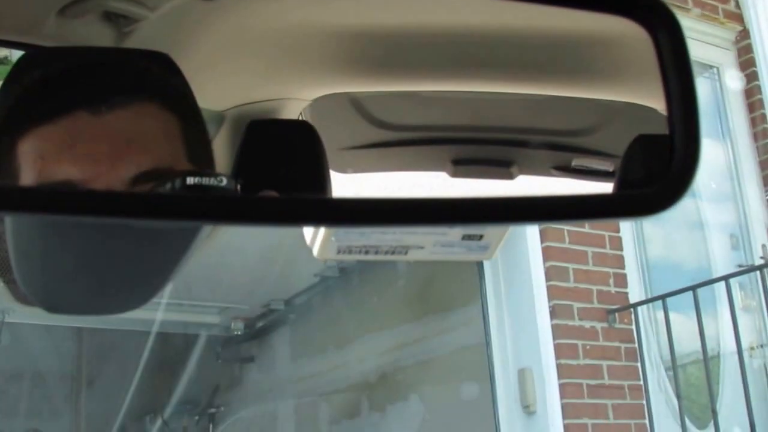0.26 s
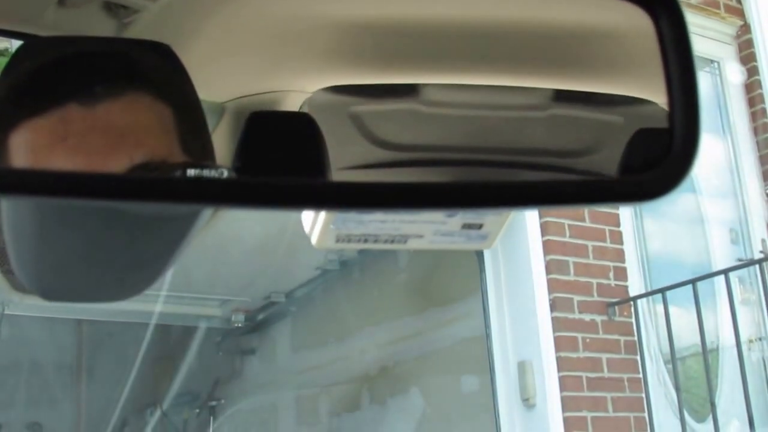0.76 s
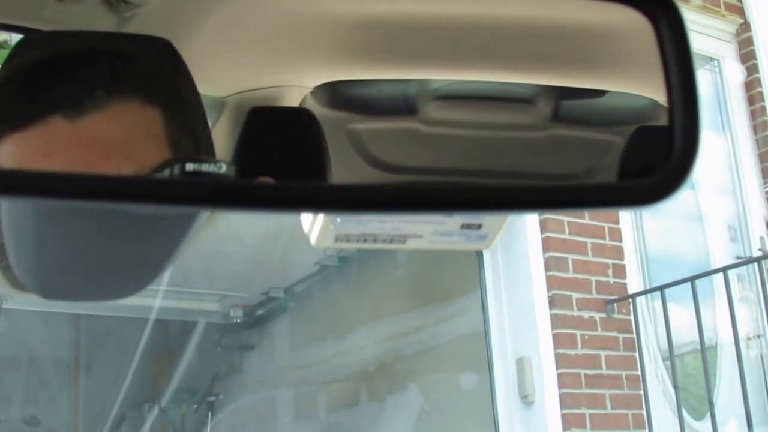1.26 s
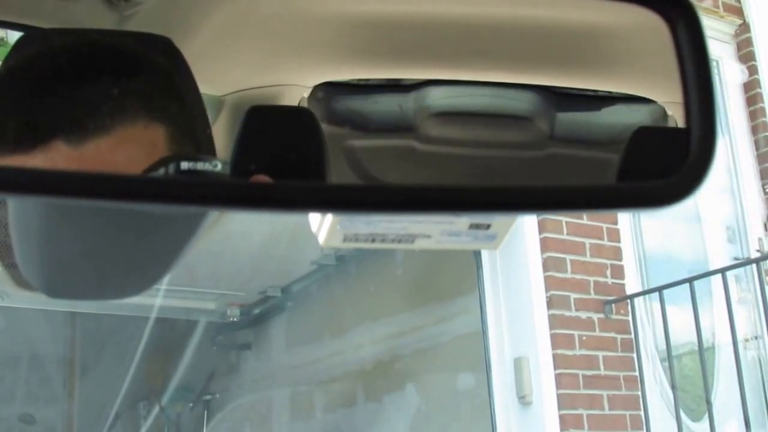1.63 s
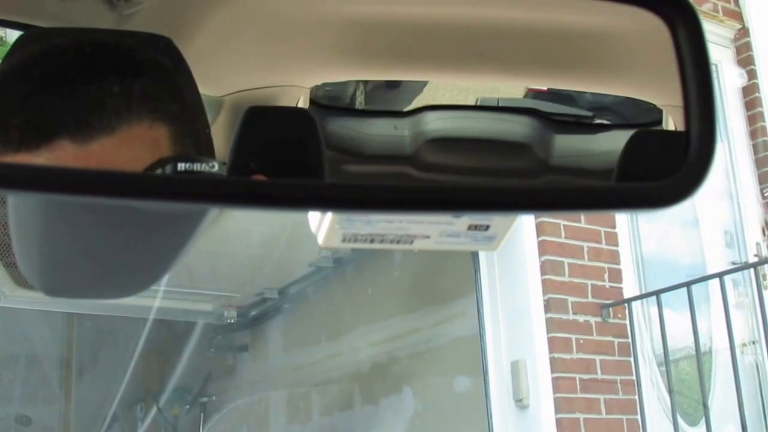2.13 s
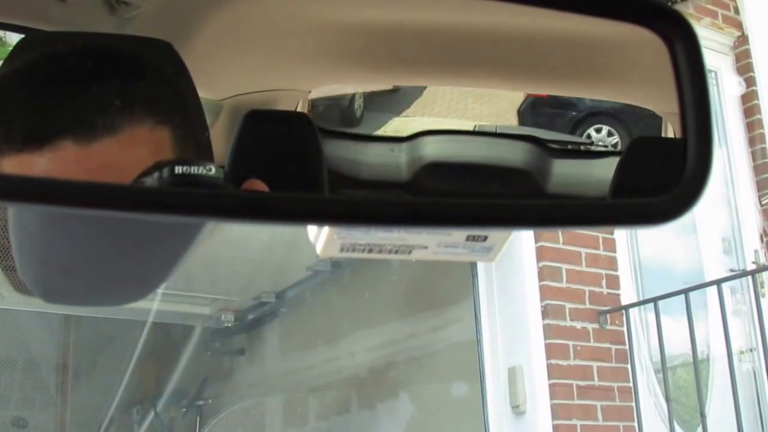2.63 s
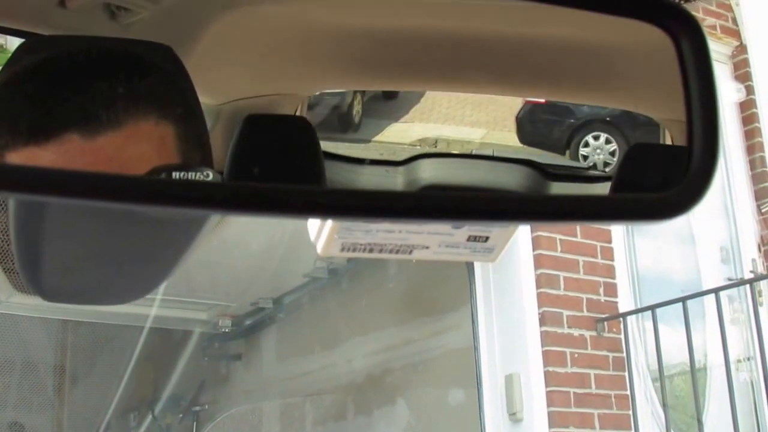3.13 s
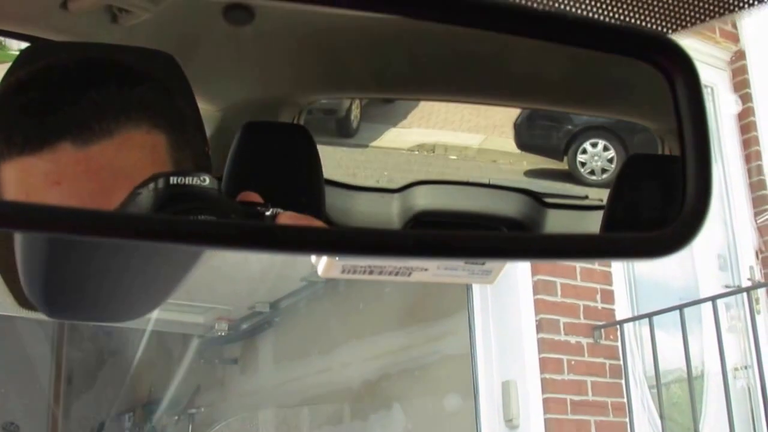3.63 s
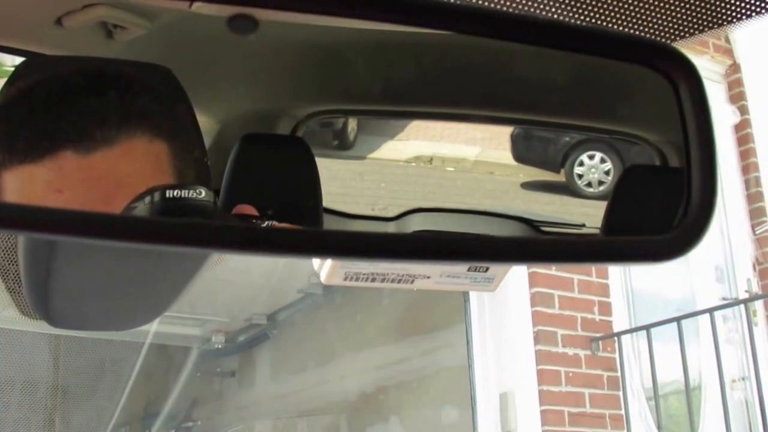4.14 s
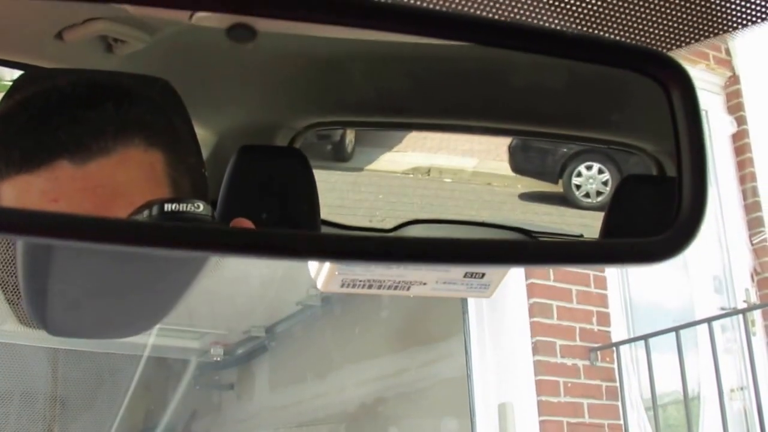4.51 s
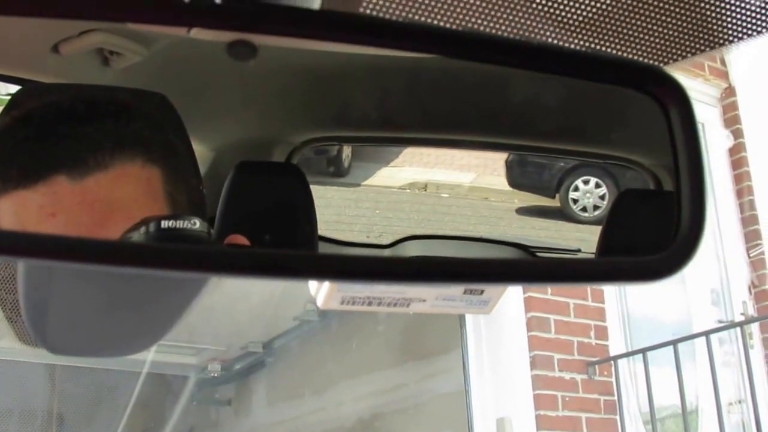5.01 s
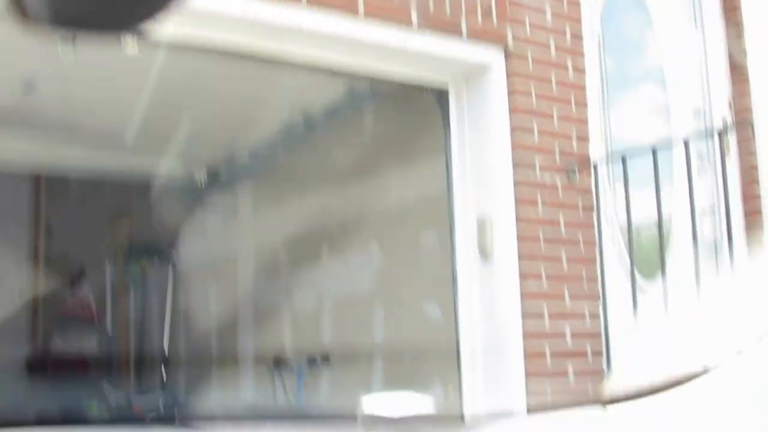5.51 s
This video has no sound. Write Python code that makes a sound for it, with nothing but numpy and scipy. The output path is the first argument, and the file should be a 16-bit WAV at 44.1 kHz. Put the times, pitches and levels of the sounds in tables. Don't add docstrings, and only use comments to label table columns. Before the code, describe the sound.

Recorded by hand inside a parked, idling car: low engine boom and soft blower hiss run throughout. After four seconds the rear hatch lands with a huge bassy thump, striker rattle and sharp metallic latch snap. Nearly a second later a duller mechanical click follows, then rustling and small plastic ticks as the recorder is turned.

```python
import sys
import numpy as np
from scipy import signal
from scipy.fft import rfft, irfft
from scipy.io import wavfile
from scipy.ndimage import uniform_filter1d

SR = 44100
rng = np.random.default_rng(int(sys.argv[2]) if len(sys.argv) > 2 else 0)


def invert_db(x):
    u = np.asarray(x, float) / 20
    return 10 ** u


def wav_record(signal):
    frames = np.transpose(np.atleast_2d(signal))
    bounded = np.clip(frames, -1, 1)
    quanta = np.round(bounded * 32767).astype(np.int16)
    wavfile.write(sys.argv[1], SR, quanta)


N = 254192
TIME = np.arange(N) / SR

# (frequency [Hz], left over right [dB])
HATCH_BALANCE = [(60, 1), (110, -5), (200, -6), (380, -2.5), (700, -5.5), (1290, -8.5), (2380, -5),
                 (4400, -3), (8120, -1), (15000, -1.0)]
# (frequency [Hz], level [dB], t60 [s])
LATCH_MODES = [(720, -3, .06), (950, -4, .07), (1990, -7, .08), (3260, -13, .07), (3420, -8, .09),
               (4210, -7, .08), (4740, -4, .09), (5290, -8, .07), (6020, -11, .07), (6370, -9, .07),
               (6700, -4, .08)]


def rms_one(x):
    return x / np.sqrt(np.mean(x ** 2) + 1e-20)


def at_hz(points, hz):
    table = np.array(points)
    return np.interp(np.log(hz + 1), np.log(table[:, 0]), table[:, 1])


def drift(rate):
    r = np.exp(-80 * np.pi * rate / SR)
    noise = rng.standard_normal(N // 40 + 2002)
    slow = signal.lfilter([1], [1, -2 * r, r * r], noise)[2000:]
    return np.interp(np.arange(N) / 40, np.arange(len(slow)), rms_one(slow))


def pair(left_right_db):
    return invert_db(np.array([[.5], [-.5]]) * left_right_db)


def coloured(spectrum, alike, lean_db):
    hz = np.arange(N // 2 + 1) * SR / N
    mid, side = rfft(rng.standard_normal((2, N))) * invert_db(at_hz(spectrum, hz))
    share = np.clip(alike(hz), -1, 1)
    both = np.sqrt(1 + share) * mid + np.sqrt(1 - share) * side * [[1], [-1]]
    return rms_one(irfft(both * pair(lean_db(hz)), N))


def resonate(x, hz, width_hz):
    r = np.exp(-np.pi * width_hz / SR)
    angle = 2 * np.pi * min(hz, SR / 2.2) / SR
    return signal.lfilter([(1 - r * r) / 2, 0, (r * r - 1) / 2], [1, -2 * r * np.cos(angle), r * r], x)


def struck(s, rise_s, t60):
    out = np.zeros(N)
    first = int(np.ceil(s * SR))
    age = TIME[first:first + int(2 * t60 * SR)] - s
    out[first:first + len(age)] = (1 - np.exp(-age / max(rise_s, 1e-4))) * invert_db(-60 * age / t60)
    return out


def tones(rows, phase, wobble_db, slip_rad):
    out = np.zeros((2, N))
    for multiple, level_db, left_right_db, lag in rows:
        angle = multiple * phase + rng.uniform(0, 2 * np.pi) + slip_rad * multiple * drift(1.0)
        gain = np.sqrt(2) * invert_db(level_db + wobble_db * drift(1.6)) * pair(left_right_db)
        out += gain * np.sin([angle - lag, angle])
    return out


def clack(blows, colour, modes, modes_db, alike):
    grain = coloured(colour, lambda hz: alike + 0 * hz, lambda hz: at_hz(HATCH_BALANCE, hz))
    burst = grain * sum(invert_db(db - 1.5) * struck(s, rise_s, t60) for s, db, rise_s, t60 in blows)
    span = slice(int(blows[0][0] * SR), int((blows[-1][0] + .5) * SR))
    white = rms_one(rng.standard_normal((2, N)) + 0.59 * rng.standard_normal(N))
    force = sum(invert_db(db) * struck(s, rise_s, t60 / 2) for s, db, rise_s, t60 in blows)
    excitation = (white * force + 1e-18)[:, span]
    for hz, db, t60 in modes:
        ringing = resonate(excitation, hz, 2 * np.log(1000) / np.pi / t60)
        burst[:, span] += invert_db(db + modes_db) * pair(at_hz(HATCH_BALANCE, hz)) * ringing
    return burst


def rings(rows, leaning, cycles=32, rise_s=None, left_lag_s=0.003):
    out = np.zeros((2, N))
    for s, peak_db, sign, hz in rows:
        lag_s = left_lag_s * 45 / (hz + 45)
        t60 = min(cycles / hz, 0.22)
        mode_rise_s = rise_s or 0.21 / hz
        swing = []
        for start in (s + lag_s, s - lag_s):
            swing.append(struck(start, mode_rise_s, t60) * np.sin(2 * np.pi * hz * (TIME - start)))
        out += np.sign(sign) * invert_db(peak_db) * pair(at_hz(leaning, hz)) * swing
    return out


def engine():
    # (time [s], firing rate [Hz], cabin level [dB])
    idle = [
        (0, 25.75, -0.5),
        (1.3, 26.05, 1),
        (2.5, 25.8, 1),
        (3.5, 25.84, -1.5),
        (3.95, 25.9, -1.5),
        (4.25, 25.9, -5),
        (4.55, 26.05, -2.5),
        (5.1, 25.9, 0),
        (5.76, 25.7, -1),
    ]
    # (multiple of firing rate [1], level [dB], left over right [dB], left phase lag [rad])
    orders = [(.5, -57, 9, 1.2), (.75, -55, 6, 1.2), (1, -32.3, 3.5, 1.23), (1.39, -46, 3, 1.1),
              (2, -35.5, -1, .95), (2.25, -53, -2, .8), (3, -42, -6, .63), (4, -48, -2.5, .5),
              (4.25, -52, -4, .5), (4.5, -52, -2, .5), (4.75, -45.5, -5, .4), (5, -47, -2, .4),
              (5.5, -46, -4, .4), (6, -54, -2, .3), (8, -59, -7, .3), (16.7, -62, -3, .5),
              (18.1, -62, -3, .5)]
    s, firing_hz, boom_db = np.transpose(idle)
    phase = 2 * np.pi * np.cumsum(np.interp(TIME, s, firing_hz)) / SR
    low = [row for row in orders if row[0] < 3.5]
    high = [row for row in orders if row[0] > 3.5]
    boom = tones(low, phase, wobble_db=1.0, slip_rad=0.045)
    rough = rng.standard_normal(N) + 0.36 * rng.standard_normal((2, N))
    band = rms_one(resonate(resonate(rough, 132.6, 61), 132.6, 61)) * pair(-6.5)
    drone = tones(high, phase, wobble_db=2.5, slip_rad=0.082)
    drone += invert_db(-41.5 + 2.0 * drift(16.0)) * band
    level_db = np.interp(TIME, s, boom_db)
    drone_follows = .6
    return invert_db(level_db) * boom + invert_db(drone_follows * level_db - 0.45) * drone


def blower():
    # (frequency [Hz], spectral density [dB per Hz])
    air_colour = [(9, -46), (17, -15.5), (45, -15), (90, -10), (150, -11), (195, -21.5), (250, -15.5),
                  (327, -20.5), (450, -21), (854, -27.5), (1030, -30), (1130, -32), (2170, -37),
                  (6000, -50), (15600, -60.5)]
    # (frequency [Hz], left-right likeness [1])
    likeness = [(60, 0.55), (130, 0.67), (290, 0.35), (640, 0.38), (1410, 0.32), (3100, -0.18),
                (6820, 0.31), (15000, -0.24)]
    # (frequency [Hz], left over right [dB])
    air_balance = [(60, 3), (110, -6.5), (200, -7.5), (380, -2.5), (700, -3.0), (1290, -2), (2380, -4),
                   (4400, -0.5), (8120, -1.5), (15000, -1.0)]
    # (frequency [Hz], width [Hz], level [dB])
    vents = [(387, 94, -53.5), (940, 163, -56)]
    # (frequency [Hz], level [dB], left over right [dB], left phase lag [rad])
    hum = [(179.85, -45.5, 2, .3), (359.7, -47, -.5, .5), (539.6, -60.5, -5, .5)]
    air = coloured(air_colour, lambda hz: at_hz(likeness, hz), lambda hz: at_hz(air_balance, hz))
    out = invert_db(-37.5 + 0.26 * drift(9.6)) * air
    for hz, width_hz, level_db in vents:
        out += invert_db(level_db + 1.9 * drift(19.0)) * rms_one(resonate(air, hz, width_hz))
    return out + tones(hum, 2 * np.pi * TIME, wobble_db=1.5, slip_rad=.001)


def handling():
    # (time [s], peak level [dB], centre frequency [Hz], t60 [s])
    ticks = [(1.165, -57, 12000, .06), (4.379, -48, 3000, .05), (4.765, -53, 5000, .05),
             (5.163, -52, 5000, .02), (5.178, -48, 1500, .03), (5.25, -51, 2500, .07),
             (5.293, -60, 8000, .03), (5.303, -60, 9000, .07), (5.379, -52, 7400, .04),
             (5.415, -51, 3200, .03), (5.456, -58, 8250, .06), (5.53, -56, 8500, .08),
             (5.549, -47, 11000, .015), (5.554, -41, 3000, .025), (5.635, -53, 9500, .08),
             (5.64, -52, 3500, 0.082), (5.688, -47, 6500, .015), (5.703, -42, 1500, .03)]
    rustle_from_s, rustle_rise_s, rustle_db = 5.25, .08, -56
    noise = rms_one(rng.standard_normal((2, N)) + 0.49 * rng.standard_normal(N)) * pair(-2.0)
    rustle = rms_one(resonate(noise, 1300, 1200))
    onset = (1 + np.tanh((TIME - rustle_from_s) / rustle_rise_s)) / 2
    out = rustle * invert_db(rustle_db + 3.2 * drift(10.0)) * onset
    for s, db, hz, t60 in ticks:
        span = slice(int(s * SR) - 500, int(s * SR) + SR // 4)
        width_hz = .5 * hz
        colour = rms_one(resonate(resonate(noise[:, span], hz, width_hz), hz, width_hz))
        out[:, span] += invert_db(db) * colour * struck(s, .0008, t60)[span]
    return out


def striker_chatter():
    # (time [s], peak level [dB], rise [s], t60 [s])
    contacts = [
        (4.002, -24, 0.00093, 0.072),
        (4.022, -21, 0.0032, 0.13),
        (4.051, -17.5, 0.0023, .12),
        (4.075, -34.5, 0.0027, 0.2),
        (4.094, -35.5, 0.0033, .1),
    ]
    # (frequency [Hz], spectral density [dB per Hz])
    chatter_colour = [(120, -32), (200, -2), (300, -4), (655, -8.5), (1460, -24), (3200, -22), (4280, -22),
                      (6640, -31), (9000, -41), (12000, -56), (15600, -70)]
    return clack(contacts, chatter_colour, LATCH_MODES, modes_db=7.5, alike=.45)


def hatch_thumps():
    # (time [s], peak level [dB], direction [sign], frequency [Hz])
    squeeze = [
        (4.022, 2.5, 1, 42),
    ]
    # (time [s], peak level [dB], direction [sign], frequency [Hz])
    air_pushes = [
        (4.088, 0, -1, 39.4),
        (4.144, -7.5, -1, 45.4),
        (4.254, -16.5, 1, 45),
        (4.46, -22, -1, 47),
        (4.772, -20, 1, 50),
        (4.843, -15, -1, 42),
        (5.16, -27, 1, 45.5),
        (5.237, -17, -1, 40),
        (5.545, -21.5, -1, 50),
    ]
    # (time [s], peak level [dB], direction [sign], frequency [Hz])
    panel_blows = [(4.003, -22.5, -1, 192), (4.0207, -19, 1, 337), (4.024, -21, 1, 479),
                   (4.034, -11.5, -1, 128), (4.048, -22, 1, 270), (4.057, -18, -1, 111),
                   (4.07, -22.5, 1, 200), (4.195, -20.5, 1, 115.5), (4.93, -22, 1, 129),
                   (5.065, -28, 1, 260), (5.255, -24.5, 1, 144)]
    thumps = rings(squeeze, HATCH_BALANCE, rise_s=0.021)
    return thumps + rings(air_pushes, HATCH_BALANCE) + rings(panel_blows, HATCH_BALANCE)


def latch_snap():
    # (time [s], peak level [dB], rise [s], t60 [s])
    contacts = [
        (4.109, -25, 0.00098, 0.065),
        (4.1145, -10, 0.0011, 0.082),
        (4.127, -22.5, 0.0024, 0.094),
        (4.14, -44, .002, 0.093),
    ]
    # (frequency [Hz], spectral density [dB per Hz])
    snap_colour = [(180, -25), (350, -4), (900, -1.5), (1150, -9.5), (1980, -7), (2710, -10.5),
                   (3400, -5.5), (5000, -8), (6950, -15), (7600, -17.5), (11000, -25.5), (14000, -35),
                   (15600, -48)]
    return clack(contacts, snap_colour, LATCH_MODES, modes_db=14.0, alike=0.33)


def motor_release():
    # (time [s], peak level [dB], rise [s], t60 [s])
    contacts = [
        (4.761, -36, .005, 0.11),
        (4.9235, -18.5, 0.0027, 0.11),
        (4.94, -30, 0.004, 0.037),
    ]
    # (frequency [Hz], spectral density [dB per Hz])
    release_colour = [(120, -32), (250, -4), (450, -1), (900, -3.5), (1660, -17.5), (2200, -20),
                      (3200, -15), (6500, -28.5), (9000, -36), (12000, -51), (15600, -60)]
    # (frequency [Hz], level [dB], t60 [s])
    release_modes = [(307, 0, 0.2), (602, 10.5, 0.1), (950, 1.5, 0.085), (2040, -0.5, 0.092),
                     (2605, -6.5, 0.1), (4160, -28, 0.11), (5550, -14, 0.08), (6900, -15, 0.051),
                     (8387, -34, 0.12), (8630, -19, 0.062)]
    # (time [s], peak level [dB], direction [sign], frequency [Hz])
    plate_knock = [
        (4.9229, -15, -1, 430),
        (4.9245, -20, 1, 540),
        (4.9285, -25, 1, 330),
        (4.934, -20, -1, 560),
        (4.926, -27, 1, 800),
    ]
    click = clack(contacts, release_colour, release_modes, modes_db=15, alike=0.32)
    return click + rings(plate_knock, HATCH_BALANCE)


def snick():
    # (frequency [Hz], peak level [dB])
    case_modes = [(1500, -26), (2200, -31), (3200, -32), (4600, -35), (6600, -34), (9500, -39),
                  (13000, -38)]
    rows = [(5.5553, db, (-1) ** (k + 1), hz) for k, (hz, db) in enumerate(case_modes)]
    return rings(rows, [(1500, -5), (8000, -17)], cycles=14, left_lag_s=0.00085)


def scene():
    background = engine() + blower() + handling()
    landing = striker_chatter() + hatch_thumps() + latch_snap()
    return background + landing + motor_release() + snick()


def roll_off(x):
    return signal.sosfilt(signal.butter(12, 15790, fs=SR, output="sos"), x)


def record(dry):
    level_db = 10 * np.log10(uniform_filter1d(np.mean(dry ** 2, axis=0), size=1500) + 1e-12)
    over_db = 0.31 * np.maximum(level_db + 19.5, 0)
    release_db = 4.6 * TIME
    held_db = np.maximum.accumulate(over_db + release_db) - release_db
    r = np.exp(-1 / (0.037 * SR))
    ducked = dry * invert_db(-signal.lfilter([1 - r], [1, -r], held_db))
    low_pass = signal.cheby2(18, 50, 16100, fs=SR, output="sos")
    return roll_off(signal.sosfilt(low_pass, ducked))


dry = scene()
out = record(dry)
wav_record(out)
```